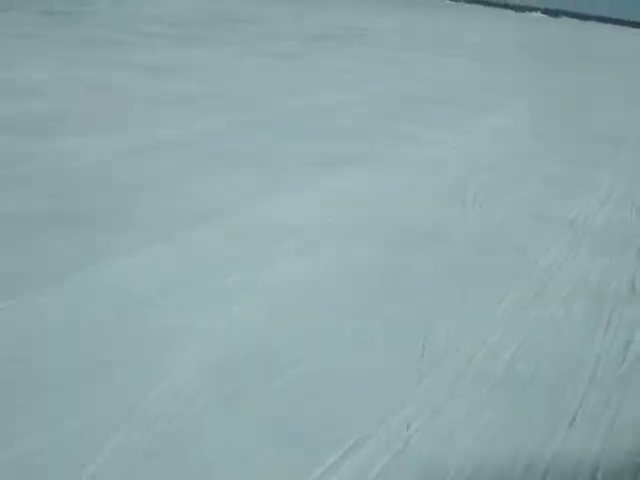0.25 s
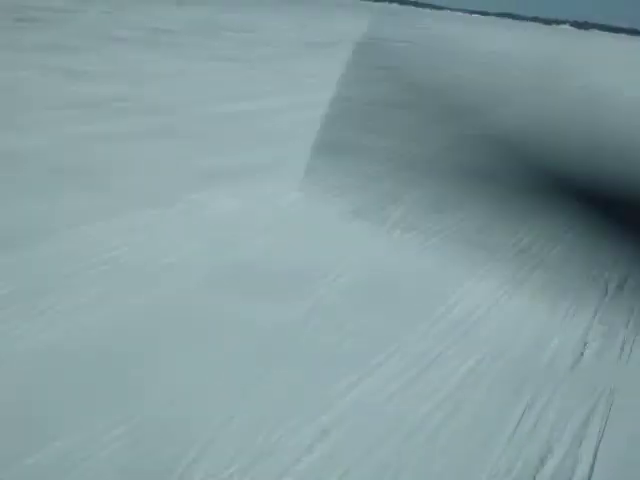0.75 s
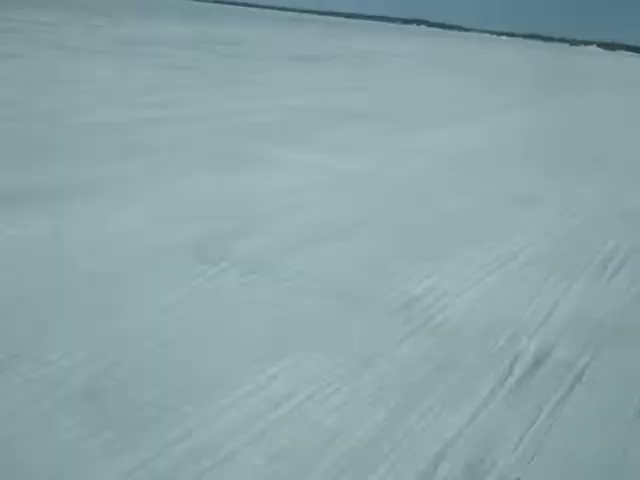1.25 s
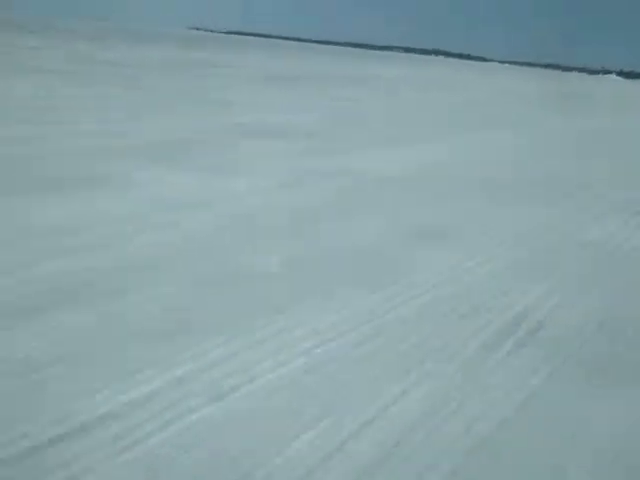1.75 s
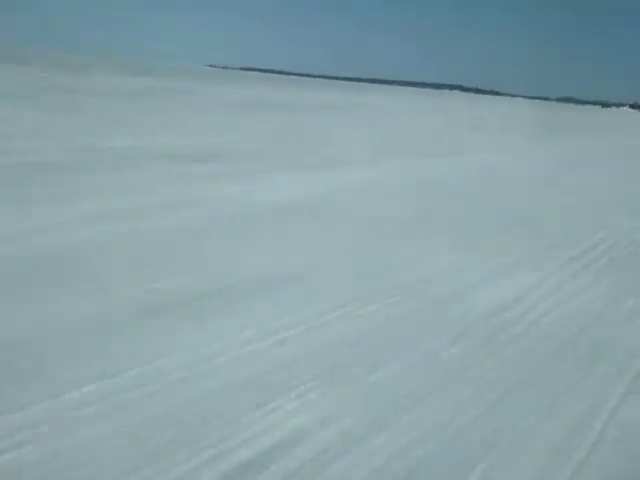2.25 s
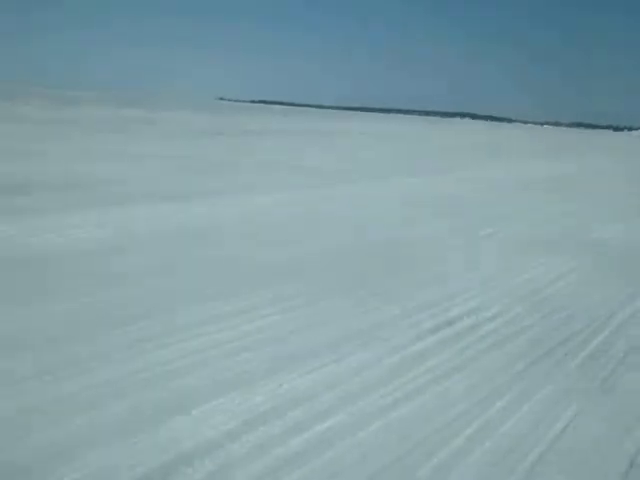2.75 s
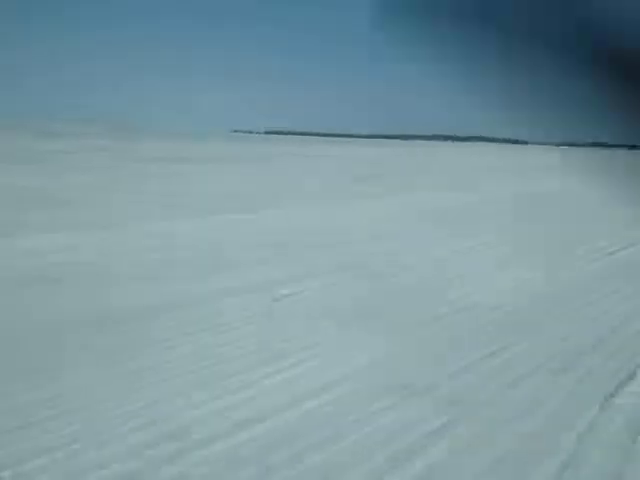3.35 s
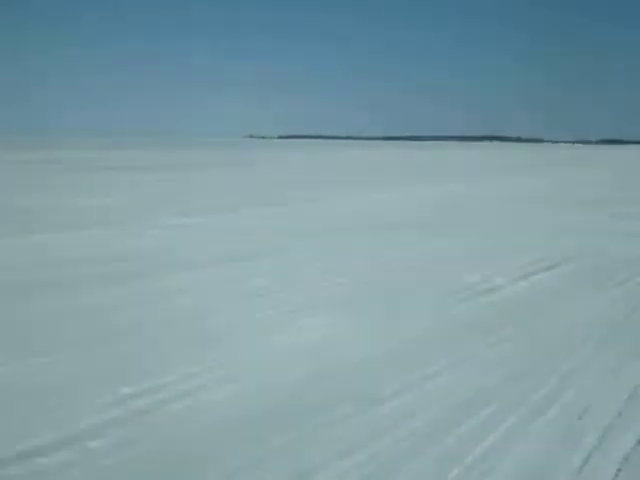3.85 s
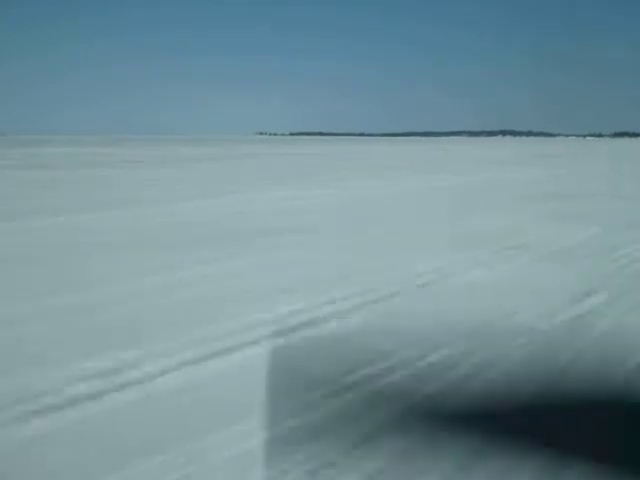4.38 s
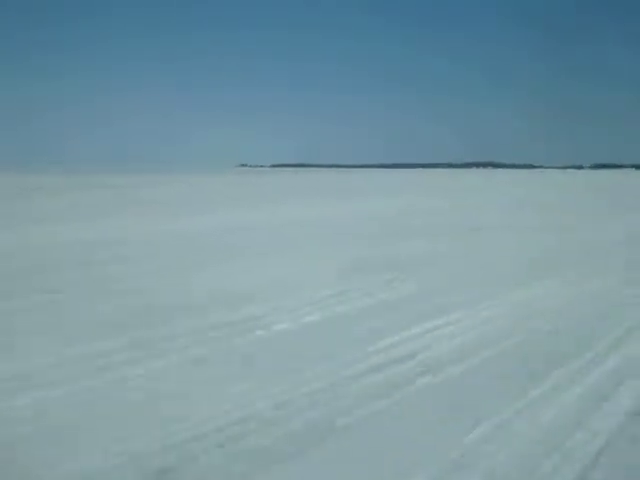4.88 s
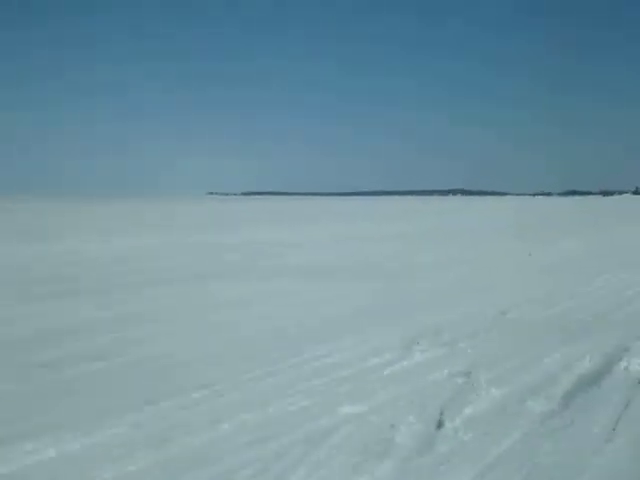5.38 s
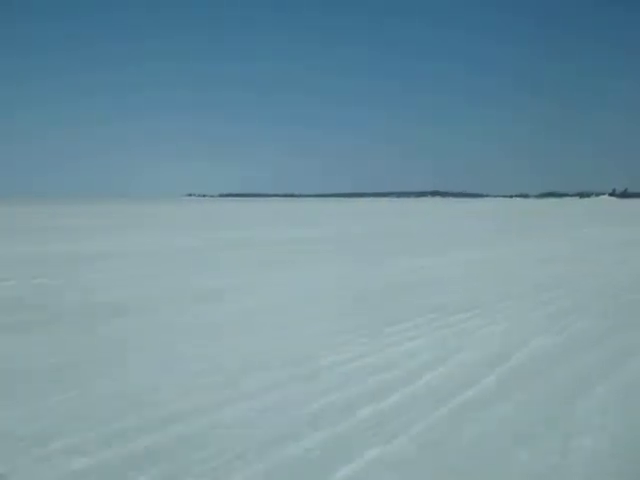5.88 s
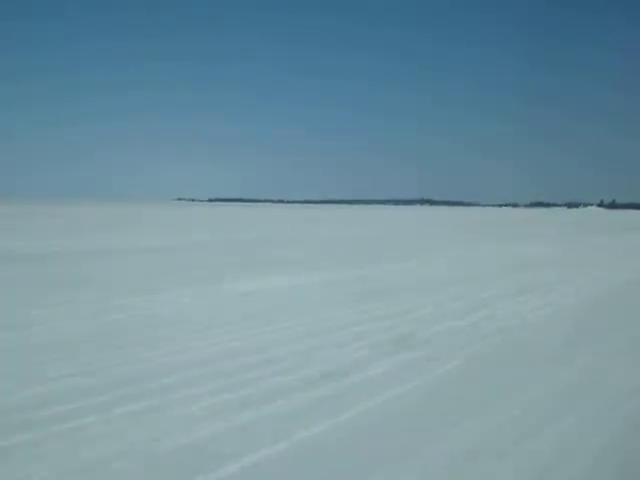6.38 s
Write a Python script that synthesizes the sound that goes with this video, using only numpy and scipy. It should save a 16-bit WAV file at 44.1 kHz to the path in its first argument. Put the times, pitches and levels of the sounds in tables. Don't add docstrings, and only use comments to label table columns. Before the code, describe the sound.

Inside a small plane sliding on snow, low engine throb and a wide rattly roar swell, then settle to a quieter, chugging idle.

```python
import sys
import numpy as np
from scipy import signal
from scipy.io import wavfile
from scipy.ndimage import uniform_filter1d

SR = 44100
rng = np.random.default_rng(int(sys.argv[2]) if len(sys.argv) > 2 else 0)


def to_wav(sig):
    pcm = np.clip(np.atleast_2d(sig), -1, 1) * 32767
    pcm = np.round(pcm).astype(np.int16)
    wavfile.write(sys.argv[1], SR, pcm.T)


def level_to_linear(level):
    exponent = np.asarray(level, float) / 20
    return 10 ** exponent


N = 292383
T = np.arange(N) / SR

# start_s, speed_hz
ENGINE_SPEED = [(0, 7.726), (0.35, 8.245), (0.8, 9.191), (1.3, 9.97), (2, 10.101), (2.7, 10.202),
                (3, 9.493), (3.35, 8.485), (3.9, 7.846), (4.3, 7.687), (5.6, 7.646), (6.63, 7.283)]
# start_s, level_db
AIRFRAME_SHAKE = [(0.0, -52.5), (0.4, -54), (0.8, -52), (1.25, -51), (1.8, -53), (2.2, -52), (2.7, -53),
                  (3.0, -51), (3.2, -55), (3.4, -52.8), (3.75, -55), (4.0, -54.5), (4.4, -59), (4.6, -56.8),
                  (4.8, -59), (5.5, -60), (6.35, -59), (6.63, -60.5)]
# multiple of cycle rate, level_db, share of the shaking they follow (dB per dB)
WEAK_ORDERS = [(7, -50, 2), (10, -47, 1.6), (11, -47, .8), (13, -52, 1.2), (14, -52, 1), (15, -45, 1.2),
               (16, -43.5, 1.5), (20, -45, .45), (24, -48, 1)]
# pitch_hz, width_hz, level_db, delay_cycles, puff_ms
FIRED_PANELS = [(525, 55, -8.5, -.01, 2.5), (130, 70, -10, .15, 5.0), (3175, 85, -28.5, .015, 4.0),
                (3430, 450, -30.5, .0, 4.0), (1330, 120, -25, .025, 2.0), (1588, 40, -27, .025, 2.0),
                (1020, 250, -18, -.03, 6.0)]
CYLINDER_LEVELS = [(1.5, -1.5, 2.5, -2.5), (0, 0, 2, 1), (-.8, .5, -1, 1.5), (-3, 1.5, 0, 1.5),
                   (-20, -12, 0, -5), (-20, -12, -9, 0), (-3, -6, -4, 0)]
# pitch_hz, level_db (per Hz)
ROAR_COLOUR = [(25, -36), (50, -28), (90, -10), (130, -5), (260, -7), (400, -8.5), (550, -10.5),
               (600, -14.5), (1100, -17.5), (1160, -24), (1650, -24.5), (2400, -30), (4200, -37),
               (7000, -52.5)]
# pitch_hz, width_hz, level_db (over the roar; negative is a dip)
ROAR_PANELS = [(310, 25, 3), (495, 30, 4), (528, 16, 7), (660, 50, 3), (795, 22, 5), (838, 28, 6),
               (953, 30, 7), (1078, 35, 6), (1195, 20, 4), (1217, 20, 6), (1330, 30, 6), (1588, 22, 7),
               (1840, 30, 4), (1922, 32, 6), (2130, 40, 4), (2620, 450, -2.5), (3172, 60, 4), (4190, 50, 4),
               (5700, 250, 2), (6250, 200, 3)]
# pitch_hz, level_db, t60_s
PART_MODES = [(1080, -9, .05), (1215, -1, .055), (1330, -1, .055), (1450, -2, .04), (1590, -4, .11),
              (1630, -6, .06), (1922, -8, .06), (2130, -11, .04), (2280, -14, .03)]
# delay_s, level_db
PART_REBOUNDS = [
    (.007, -9),
    (.017, -9),
    (.055, -12),
]
# start_s, lost_db (negative is harder)
GLANCING_STRIKES = [(.116, 2.5), (.484, -2), (3.984, 2.5), (4.116, 3), (.363, 18), (.71, 4), (1.034, 11),
                    (1.239, 15), (1.441, 3), (1.541, 9), (1.738, 4.5), (1.94, 6.5), (2.234, 28), (2.527, 8),
                    (2.726, 14), (3.031, 6), (3.255, -0.5), (3.37, 12), (3.731, 3), (4.245, 7.5),
                    (4.633, 8), (4.765, 1), (5.68, 3), (1.639, -1), (.241, 3), (2.826, 2.5), (2.93, -1),
                    (5.156, -4.5), (6.076, -3.5), (6.344, -1.5)]
# start_s, level_db, pitch_hz
DULL_THUMPS = [(0.156, -25, 520), (0.276, -19, 452), (0.384, -18.5, 485), (0.61, -16, 540), (1.061, -27, 494),
               (1.481, -16, 500), (1.888, -12.5, 527), (2.137, -23, 497), (2.286, -13, 530),
               (2.431, -15, 533), (3.035, -21, 460), (3.251, -17.5, 533), (3.455, -23, 308),
               (3.497, -14, 430), (3.752, -19, 570), (4.756, -29, 494), (5.758, -23, 420), (6.414, -27, 530)]

START_TURNS = 1.086
IDLE_HZ, FULL_SHAKE_DB = 7.65, -53


def evened(x):
    return x / np.sqrt(np.mean(x ** 2) + 1e-20)


def curve(rows, t, column):
    return np.interp(t, [r[0] for r in rows], [r[column] for r in rows])


def peak(hz, centre_hz, width_hz):
    return 1 / (1 + (2 * (hz - centre_hz) / width_hz) ** 2)


def resonate(x, hz, width_hz):
    r = np.exp(-np.pi * width_hz / SR)
    return signal.lfilter([1, 0, -1], [1, -2 * r * np.cos(2 * np.pi * hz / SR), r * r], x)


def bandpass(x, order, low_hz, high_hz):
    sos = signal.butter(order, [low_hz, high_hz], "band", fs=SR, output="sos")
    return signal.sosfilt(sos, x)


def wander(hz):
    sos = signal.butter(2, hz, fs=SR, output="sos")
    return evened(signal.sosfilt(sos, rng.standard_normal(N)))


def cycles():
    return START_TURNS + np.cumsum(curve(ENGINE_SPEED, T, column=1)) / SR


def shaking():
    return curve(AIRFRAME_SHAKE, T, column=1) - FULL_SHAKE_DB


def engine_orders(turns):
    def tone(order):
        return np.sqrt(2) * np.cos(2 * np.pi * (order * turns + rng.random()))

    speed_hz, effort_db = curve(ENGINE_SPEED, T, column=1), shaking()
    over_hz = speed_hz - IDLE_HZ
    load = uniform_filter1d(np.gradient(speed_hz) * SR, size=SR // 3)

    boom_db = -52 + 9 * over_hz + 0.1 * load
    boom = level_to_linear(boom_db + 0.6 * wander(hz=9.9)) * tone(order=8)

    thump_db = -48 - 0.2 * over_hz - 3 * np.clip(load, 0, 1) * peak(4 * speed_hz, 38, 3.5)
    thump = level_to_linear(thump_db + 0.6 * wander(hz=5)) * tone(order=4)

    growl_db = -54 + 2.5 * load + 2 * effort_db + 12.5 * peak(12 * speed_hz, 105, 26)
    growl = level_to_linear(growl_db + 3.8 * wander(hz=9.8)) * tone(order=12)

    weak = np.zeros(N)
    for order, level_db, share in WEAK_ORDERS:
        cabin_db = 7 * peak(order * speed_hz, 106, 22)
        weak_db = level_db + share * effort_db + cabin_db
        weak += level_to_linear(weak_db + 0.89 * wander(hz=1.5)) * tone(order)
    return boom + thump + growl + weak


def firings(turns):
    out = np.zeros(N)
    for (hz, width_hz, level_db, delay, puff_ms), pattern in zip(FIRED_PANELS, CYLINDER_LEVELS):
        count = np.floor(4 * (turns - delay)).astype(int)
        luck_db = 1.2 * rng.standard_normal(400)[count]
        cylinder_db = np.array(pattern)[count % len(pattern)]
        kicks = np.r_[0, np.diff(count)] * level_to_linear(cylinder_db + luck_db)
        decay = np.exp(-1000 / puff_ms / SR)
        puffs = signal.lfilter([1], [1, -decay], kicks) * rng.standard_normal(N)
        blows = puffs + 0.8 * np.sqrt(puff_ms * SR / 2000) * kicks
        ring = resonate(resonate(blows, hz, width_hz), hz, 3 * width_hz)
        out += level_to_linear(level_db) * evened(ring)
    return out * level_to_linear(0.8 * shaking() - 31.5)


def floor_hum():
    turns = np.cumsum(213 + 0.9 * wander(hz=2.9)) / SR
    level_db = -37 + 0.54 * shaking() + 0.85 * wander(hz=11.0)
    return level_to_linear(level_db) * np.sqrt(2) * np.cos(2 * np.pi * turns)


def airframe_roar():
    frames, hz = N // 512 + 6, np.fft.rfftfreq(2048, 1 / SR)
    t = np.arange(frames) * 512 / SR
    real, imag, patches = rng.standard_normal((frames, len(hz), 3)).T

    colour_hz, colour_db = np.transpose(ROAR_COLOUR)
    power = level_to_linear(np.interp(np.log(hz + 1), np.log(colour_hz), colour_db)) ** 2
    power *= 1 + sum((level_to_linear(db) ** 2 - 1) * peak(hz, centre, width) ** 2
                     for centre, width, db in ROAR_PANELS)

    regions = np.interp(np.log(hz + 1), np.log([150, 500, 1700, 4000]), np.arange(4))
    rumble, body, rattle = [np.maximum(0, 1 - abs(regions - k))[:, None] for k in range(3)]
    effort_db = np.interp(t, T, shaking())
    over_hz = curve(ENGINE_SPEED, t, column=1) - IDLE_HZ
    level_db = effort_db * (1 + rumble * (1.2 - 1) + body * (0.81 - 1)) + rattle * 0.3 * over_hz

    patches = evened(uniform_filter1d(uniform_filter1d(patches, 16, 0), 5, 1))
    spectra = (real + 1j * imag) * np.sqrt(power / power.sum())[:, None]
    spectra = spectra * level_to_linear(level_db + 0.34 * patches)
    roar = signal.istft(spectra, nperseg=2048, noverlap=1536)[1][:N]
    return level_to_linear(-27.0 + 0.5 * wander(hz=25)) * roar


def chatter():
    size = level_to_linear(3.0 * np.minimum(rng.exponential(1, N), 4)) * (rng.random(N) < 70 / SR)
    puffs = signal.lfilter([1], [1, -np.exp(-1 / .0015 / SR)], size) * rng.standard_normal(N)
    return level_to_linear(shaking() - 52.5) * evened(bandpass(puffs, 3, 800, 2200))


def strikes(turns):
    at = np.flatnonzero(np.diff(np.floor(turns)))
    level_db = -33 + 1.3 * shaking()[at] + 0.4 * rng.standard_normal(len(at))
    lost_db = sum(db * (abs(at / SR - s) < .03) for s, db in GLANCING_STRIKES)
    return np.transpose([at / SR, level_db - lost_db])


def knocks(turns):
    out, t = np.zeros(N + SR), np.arange(SR // 5) / SR
    blows = strikes(turns)
    hz, mode_db, t60 = np.transpose(PART_MODES)[:, :, None]
    chances = rng.standard_normal((len(blows), 3, len(PART_MODES), 1))
    for (start_s, level_db), (level_luck, pitch_luck, phase) in zip(blows, chances):
        mode_turns = hz * (1 + 0.0029 * pitch_luck) * t + phase
        fade = level_to_linear(mode_db + 0.8 * level_luck - 60 * t / t60)
        ring = (fade * np.sin(2 * np.pi * mode_turns)).sum(0)
        burst = rng.standard_normal(len(t)) * level_to_linear(-60 * t / 0.041)
        crack = evened(bandpass(burst, 4, 1050, 2200)) * level_to_linear(-20)
        blow = (ring + crack) * (1 - np.exp(-t / .0006))
        for delay_s, rebound_db in [(0, 0.023)] + list(PART_REBOUNDS):
            at = round((start_s - .002 + delay_s) * SR)
            out[at:at + len(t)] += level_to_linear(level_db + rebound_db) * blow
    return out[:N]


def dull_thumps():
    out, t = np.zeros(N + SR), np.arange(SR // 10) / SR
    thud = level_to_linear(-6.5 - 60 * t / 0.053) * np.sin(2 * np.pi * 170 * t)
    onset = 1 - np.exp(-t / .0015)
    for start_s, level_db, hz in DULL_THUMPS:
        ring = level_to_linear(-60 * t / 0.022) * np.sin(2 * np.pi * hz * t)
        at = round(start_s * SR)
        out[at:at + len(t)] += level_to_linear(level_db + 1.5) * (ring + thud) * onset
    return out[:N]


def scene():
    turns = cycles()
    engine = engine_orders(turns) + firings(turns)
    airframe = floor_hum() + airframe_roar() + chatter()
    return (engine + airframe + knocks(turns) + dull_thumps())[None]


def band_limit(x):
    return signal.sosfilt(signal.butter(12, 7780, fs=SR, output="sos"), x)


def record(dry):
    x = signal.lfilter(*signal.iirnotch(2890, 11.0, SR), dry)
    x = signal.sosfilt(signal.butter(5, 23, "high", fs=SR, output="sos"), x)
    band_end = signal.firwin(131, 7050, window=("kaiser", 8.0), fs=SR)
    x = signal.oaconvolve(x, band_end[None], "same")
    mix = x + level_to_linear(-101) * rng.standard_normal(x.shape)
    return band_limit(mix)


dry = scene()
out = record(dry)
to_wav(out)
```